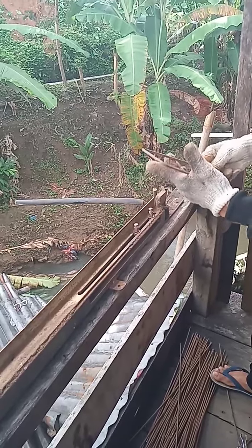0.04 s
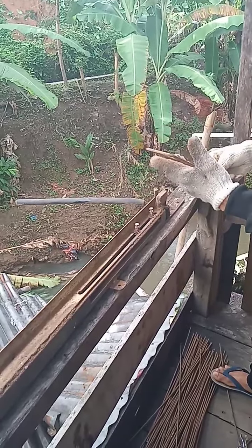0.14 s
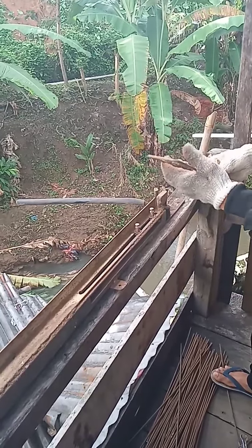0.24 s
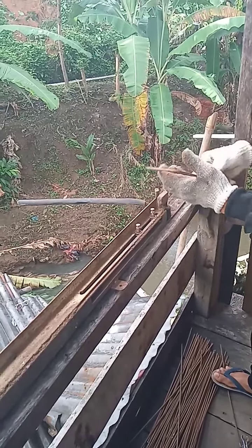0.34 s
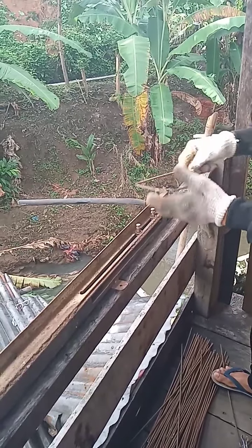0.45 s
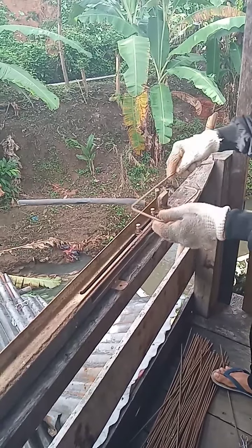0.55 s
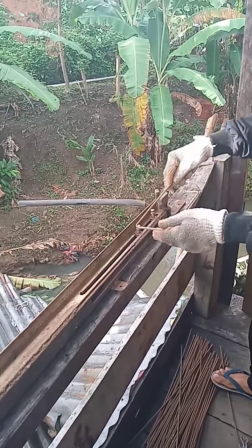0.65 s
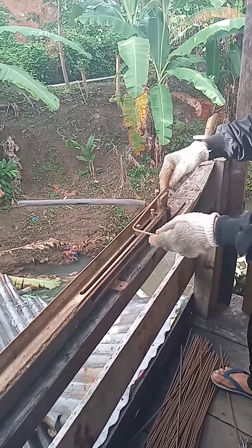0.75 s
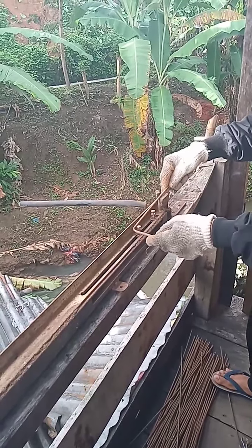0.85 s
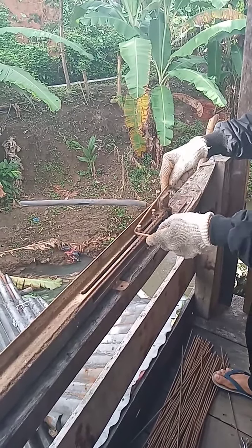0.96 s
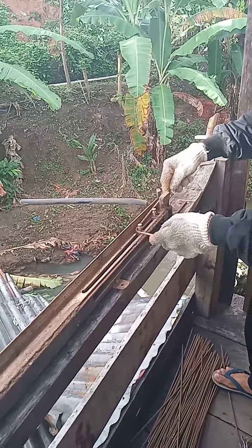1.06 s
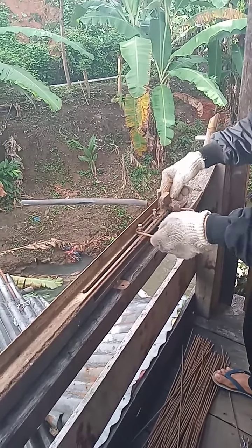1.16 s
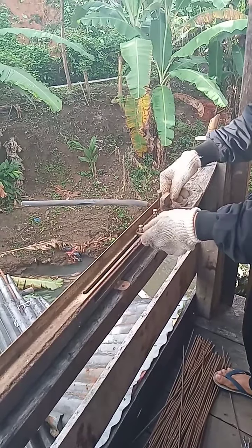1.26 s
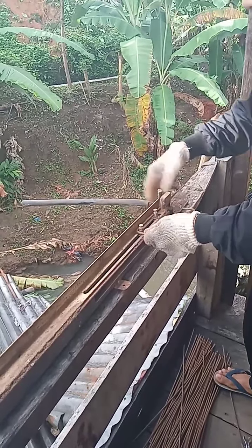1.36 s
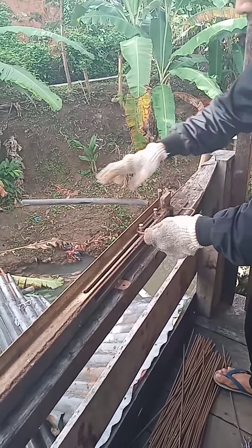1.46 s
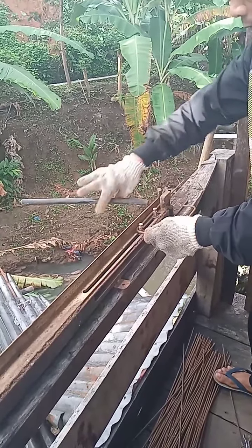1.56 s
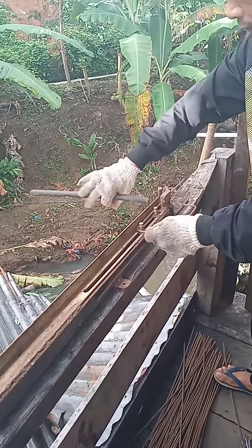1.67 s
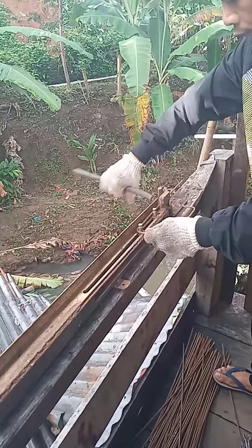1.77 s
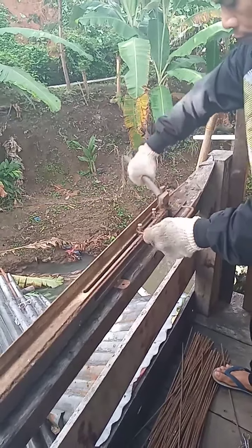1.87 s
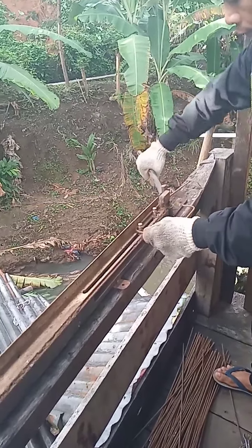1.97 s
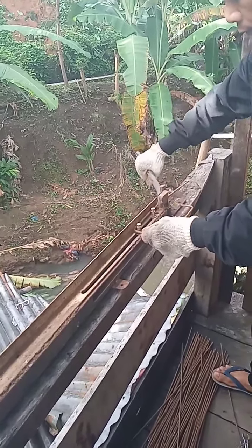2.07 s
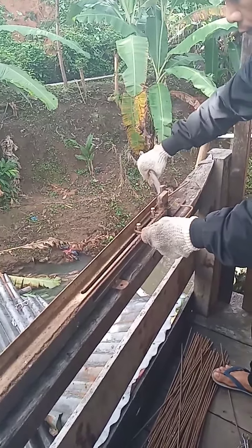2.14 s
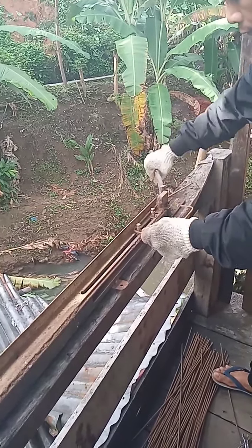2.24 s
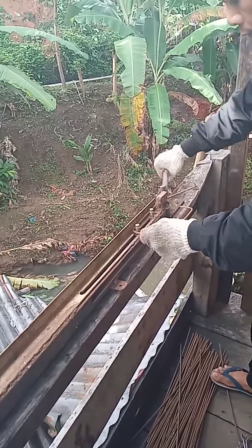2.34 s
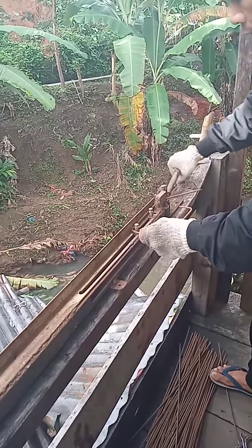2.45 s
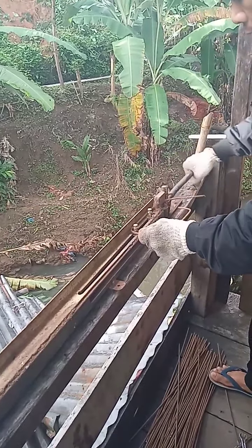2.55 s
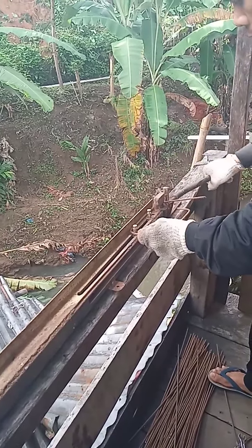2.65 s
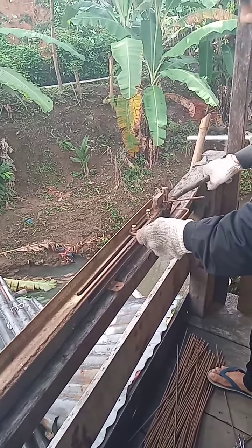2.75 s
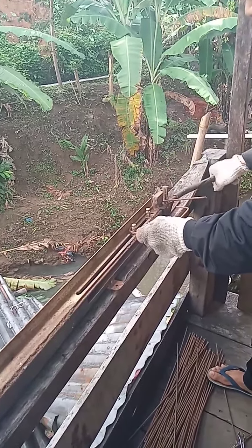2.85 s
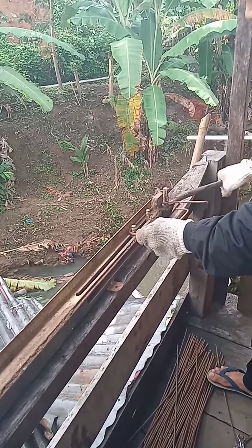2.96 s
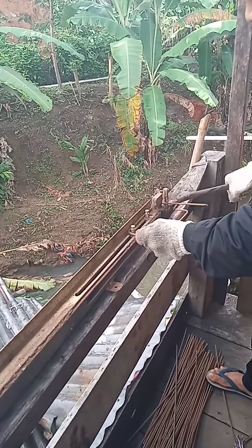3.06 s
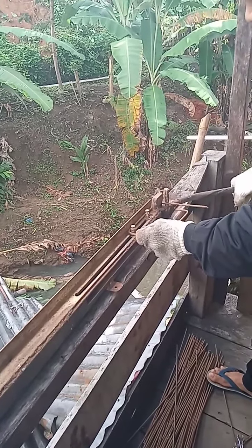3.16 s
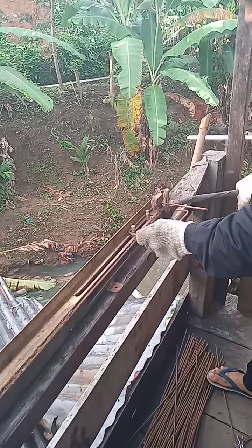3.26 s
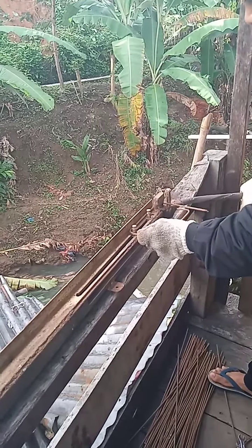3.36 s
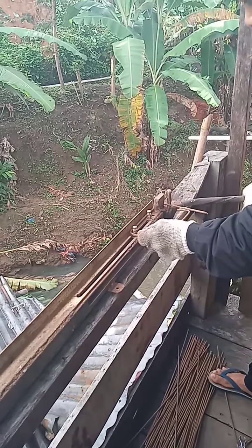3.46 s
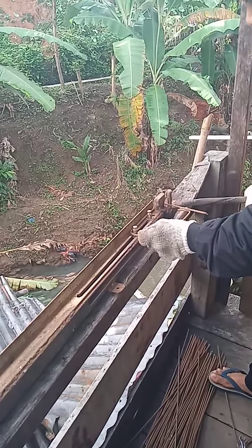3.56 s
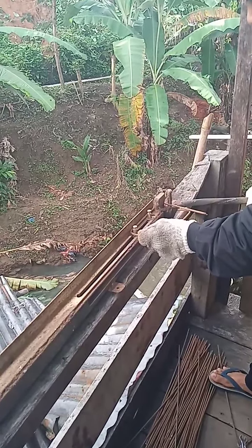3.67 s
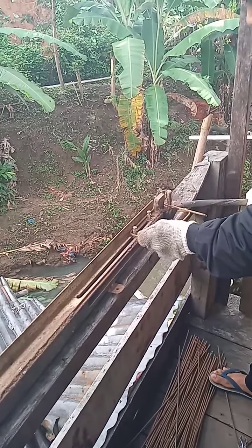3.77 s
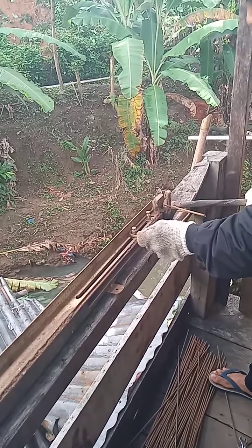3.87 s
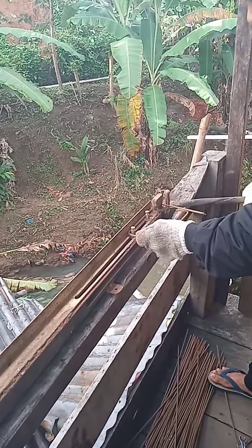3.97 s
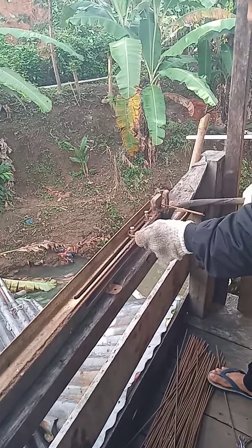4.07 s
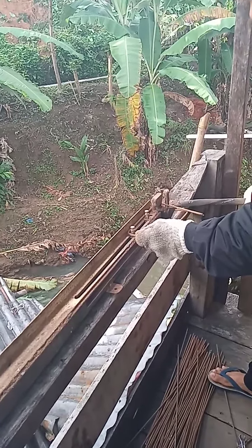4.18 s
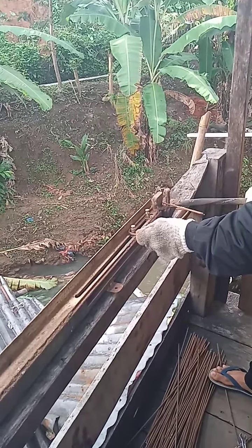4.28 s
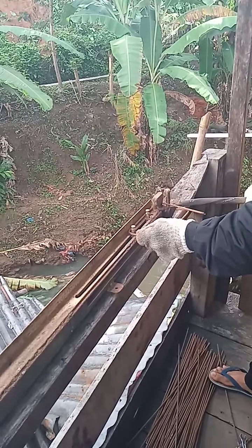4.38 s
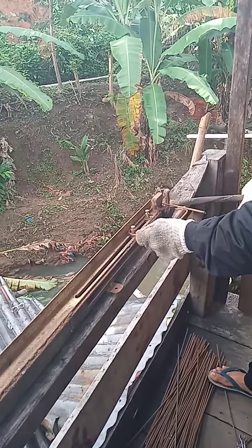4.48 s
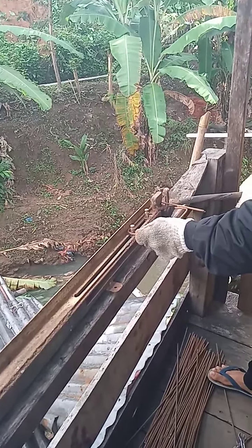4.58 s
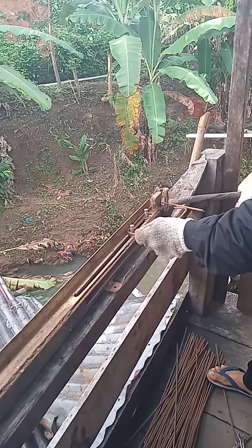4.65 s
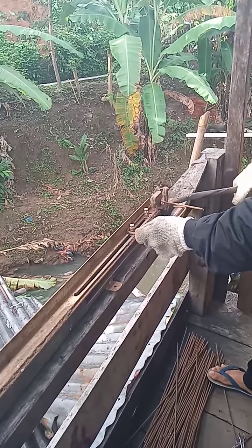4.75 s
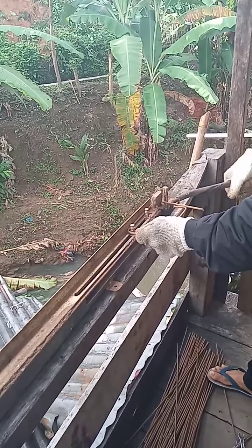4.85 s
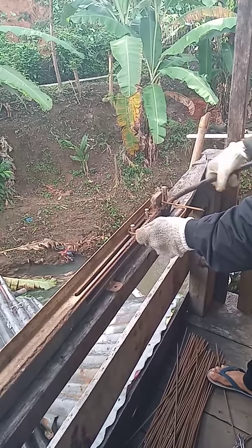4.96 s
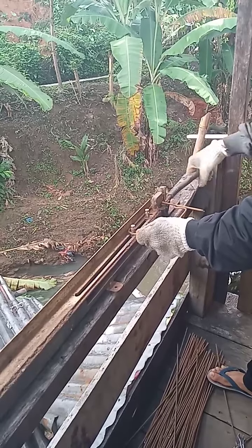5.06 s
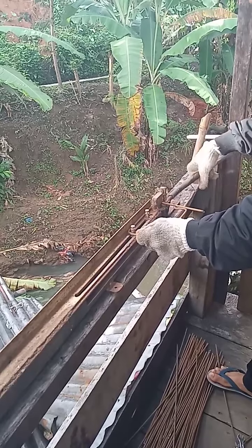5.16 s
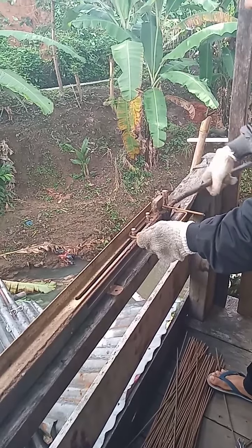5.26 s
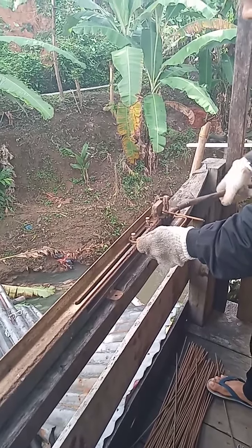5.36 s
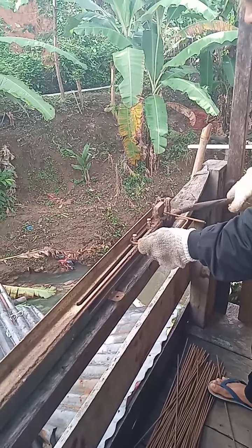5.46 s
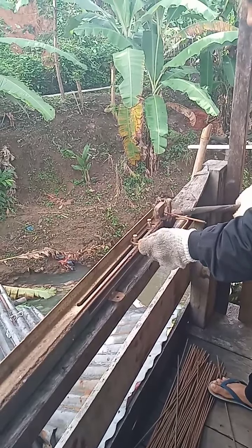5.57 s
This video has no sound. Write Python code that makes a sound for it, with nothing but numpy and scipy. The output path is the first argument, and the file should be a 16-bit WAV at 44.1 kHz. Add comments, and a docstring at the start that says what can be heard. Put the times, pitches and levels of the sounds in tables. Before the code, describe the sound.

Outdoors under an open roof, soft steady hiss and low rumble. A thin steel rod taps and rattles sharply between metal pins, pauses, then a few faint lever clinks lead to one loud, bright clank that shakes the wooden frame. Afterwards it is mostly quiet, with small squeaks of rubbing steel and dull knocks. Close microphone, both channels alike.

```python
"""A soft outdoor hiss and a low floor boom come first, under an open roof.
Then a thin steel rod clinks between the pins of a bending jig: ringing modes over a clash of noise.
The hand lever clinks too and bangs home once; the timber frame knocks and carries each blow on as noise.
The rod squeaks as it is pulled round: unsteady two-mode tones, roughened by scraping."""
import sys
import numpy as np
from scipy import signal
from scipy.io import wavfile

SR = 44100
rng = np.random.default_rng(int(sys.argv[2]) if len(sys.argv) > 2 else 0)


def persist_wave(psi):
    """Save psi, clipped to +-1, as 16-bit WAV."""
    counts = np.round(np.clip(psi, -1, 1) * 32767).astype(np.int16)
    wavfile.write(sys.argv[1], SR, np.atleast_2d(counts).T)


N = 247842
TIME = np.arange(N) / SR
EDGES = 28 * 2 ** (np.arange(56) / 6)   # sixth-octave band edges, Hz
CENTRES = np.sqrt(EDGES[1:] * EDGES[:-1])

# the hand lever meets the jig: start_s, level_db, body_db, treble_db, crack_db, ring_t60_s,
# favoured_low_mode_hz, favoured_high_mode_hz (levels in relative dB)
LEVER_BLOWS = [ (1.549, -37, 2.5, 4, -16, 0.13, 608, 2640), (1.566, -44, 9.5, 2, -9, 0.095, 842, 3360),
               (1.8620, -39, -3, -3, -13, 0.28, 1165, 3330),
               (1.9017, -31.5, 4.5, -7, -8.5, 0.086, 495, 608),
               (1.9303, -33.5, 5, -2, -10, 0.088, 1585, 2820),
               (2.5840, -18.5, 0, -0.5, -2.5, 0.19, 2977, 3784),
               (2.5873, -12, -3, 1.5, 3, 0.078, 800, 3810), (4.5030, -37.5, 2, -3.5, -17, 0.11, 400, 3350)]


def from_db(db):
    """Decibels to gain."""
    return 10 ** (np.asarray(db) / 20)


def rms_one(x):
    """Scale to unit rms."""
    return x / np.sqrt(np.mean(x ** 2) + 1e-20)


def at_hz(points, hz):
    """Read a table on a log-frequency axis."""
    f, value = np.transpose(points)
    return np.interp(np.log(hz), np.log(f), value)


def decay(t, t60):
    """Fall by 60 dB in t60 seconds."""
    return np.exp(-np.log(1000) * t / max(t60, 1e-3))


def add(out, s, sound):
    """Mix a sound in at time s."""
    i = int(np.clip(round(s * SR), 0, N - 1))
    out[i:i + len(sound)] += sound[:N - i]


def drift(rate):
    """Random motion through `rate` normal draws a second, joined by straight lines."""
    return np.interp(TIME * rate, np.arange(4096), rng.standard_normal(4096))


def noise_bands(size, order=3):
    """Sixth-octave bands of noise; a band 1 kHz wide would have rms 1."""
    # two noises alternate, so that neighbouring bands are independent
    white = rng.standard_normal((2, size + SR // 4)) * np.sqrt(SR / 2000)
    bands = []
    for k in range(len(CENTRES)):
        sos = signal.butter(order, EDGES[k:k + 2], "band", fs=SR, output="sos")
        bands.append(signal.sosfilt(sos, white[k % 2]))
    return np.array(bands)[:, -size:]   # drop the filters' start-up


def outdoors(middle_patchy_db=6.0, hiss_patchy_db=2.0, patches_per_s=13,
             hiss_db=2.0, waver_db=0.4, wavers_per_s=6):
    """Nearly steady hiss over a slowly swelling rumble and middle, which are patchier than the hiss."""
    # spectrum of the outdoor noise: frequency_hz, density_db (relative, per Hz)
    air = [(30, -20), (64, -33), (100, -4), (190, -1), (350, -4), (720, -15.5), (1150, -11), (1500, -7),
           (3700, -11), (4600, -23.5), (5400, -34), (7800, -34), (10000, -50.5), (15500, -50)]
    # swell of its low and middle range: time_s, rumble_db, middle_db (relative)
    background = [(0, 3, 2), (.62, 0, 6.5), (1.05, -1, 1.5), (1.4, 6.5, -3), (2.05, 8.5, 11.5),
                  (2.5, 2, 4.5), (3.2, 1.5, -1.5), (3.9, 1, 6), (4.42, -1.5, 0.5), (4.65, -2, 6.5),
                  (5.3, 3, 0.5), (5.62, -6, 3)]
    level_db = -50.5   # rms of the whole
    s, *columns = np.transpose(background)
    rumble, middle = [np.interp(TIME, s, column) for column in columns]
    hiss = hiss_db + waver_db * drift(wavers_per_s)
    out = np.zeros(N)
    for hz, band in zip(CENTRES, noise_bands(N)):
        # crossfade the three ranges over frequency
        low = at_hz([(220, 1), (600, 0)], hz)
        high = at_hz([(900, 0), (1400, 1)], hz)
        swell_db = low * rumble + high * hiss + (1 - low - high) * middle
        patchy_db = at_hz([(1200, middle_patchy_db), (2200, hiss_patchy_db)], hz)
        out += band * from_db(at_hz(air, hz) + swell_db + patchy_db * drift(patches_per_s))
    return from_db(level_db) * rms_one(out)


def platform(hz=82, width=28):
    """The lowest resonance of the wooden floor, stirred by shifting weight and shaken by the heaviest blow."""
    # the worker shifts weight to place the rod, then to fetch the lever: start_s, length_s, level_db
    moves = [(0, 0.43, -60), (0.47, 0.11, -50.5), (1.27, 0.92, -54.5)]
    attack_s, move_t60_s = 0.033, 0.66
    rest_db, shaken_db, shaken_t60_s = -77, -38.5, 1.39
    bang_s = max(LEVER_BLOWS, key=lambda row: row[1])[0]
    stir = np.full(N, from_db(rest_db))
    add(stir, bang_s, from_db(shaken_db) * decay(TIME, shaken_t60_s))
    for s, length, db in moves:
        rise = np.minimum(TIME / attack_s, 1)
        fall = decay(np.maximum(TIME - length, 0), move_t60_s)
        add(stir, s, from_db(db) * rise * fall)
    band = signal.butter(2, [hz - width / 2, hz + width / 2], "band", fs=SR, output="sos")
    return stir * rms_one(signal.sosfilt(band, rng.standard_normal(N)))


def contacts():
    """Every contact as (start s, level dB, colour over Hz in dB, build-up s, ring t60 s, favoured modes Hz)."""
    # the rod drops between the pins and rattles: start_s, level_db, body_db, treble_db, crack_db,
    # ring_t60_s, favoured_low_mode_hz, favoured_high_mode_hz (levels in relative dB)
    rod_taps = [ (.7412, -25, -0.5, 11, 0.5, 0.084, 2845, 3810),
                (.7537, -27, -13, 1, -22, 0.11, 1735, 3715), (.7870, -27, 4.5, 2, -13.5, 0.072, 608, 3660),
                (.842, -39, -1.5, -1.5, -16, 0.1, 993, 2640), (1.002, -50, 17, 10.5, 5, 0.21, 1735, 3390),
                (1.0183, -31.5, 4.5, 5.5, 7, 0.086, 3390, 4440),
                (1.0322, -18.5, -8, -4.5, -15.5, 0.054, 1735, 3330),
                (1.0400, -21, -0.5, 1.5, -1, 0.076, 842, 1735),
                (1.0565, -30, 8, -4, -10, 0.092, 2640, 3520), (1.141, -37.5, 8, -3, -9, 0.22, 1585, 3580),
                (1.203, -41.5, 7, -2, -7, 0.13, 1735, 1954), (1.313, -43.5, 5, -7, -17, 0.45, 993, 1585),
                (1.3412, -26, 0.5, -4.5, -17, 0.12, 842, 2610)]
    # dull knocks as the timber frame takes the load: start_s, level_db (relative), pitch_hz, ring_t60_s
    knocks = [(1.641, -35, 151, 0.076), (1.709, -41.5, 660, .26), (4.094, -37.5, 423, 0.2),
              (4.55, -42.5, 624, 0.33), (5.098, -33.5, 505, 0.095), (5.393, -43.5, 289, 0.1),
              (5.604, -39.5, 616, 0.065)]
    rod_bass_db, lever_bass_db = -13, -2   # the light rod hardly moves the frame, the heavy lever does
    # a harder blow builds up faster; the lightest touches only graze
    shortest_build_s, longest_build_s = 0.0019, 0.009
    medium_db, extra_build_s, build_halves_db = -30, 0.00036, 3.5   # extra build-up at medium level
    knock_build_s, knock_fall_db_per_octave = 0.005, 5   # falls above the pitch, flat below it

    for rows, bass_db in ((rod_taps, rod_bass_db), (LEVER_BLOWS, lever_bass_db)):
        for s, db, body_db, treble_db, crack_db, t60, *favoured in rows:
            colour = [(180, bass_db), (650, body_db), (1500, 0.0064), (3600, treble_db), (6500, crack_db)]
            extra_s = extra_build_s * .5 ** ((db - medium_db) / build_halves_db)
            build = min(shortest_build_s + extra_s, longest_build_s)
            yield s, db, colour, build, t60, favoured
    for s, db, hz, t60 in knocks:
        octaves_above = np.maximum(np.log2(CENTRES / hz), 0)
        colour = np.column_stack([CENTRES, -knock_fall_db_per_octave * octaves_above])
        yield s, db, colour, knock_build_s, t60, [hz]


def blows(modes_db=0.0, favour_db=10.0, clash_db=-6.5, after_db=0.0, scatter_db=0.5,
          usual_t60=0.14, chatter_db=2.5, uneven_db=4.0):
    """Each blow rings the steel's modes over a chattering clash, then frame and roof carry it on."""
    # ringing of rod, pins and channel: frequency_hz, level_db (relative), t60_s (before the grip damps it)
    jig_modes = [(157.7, -14, 0.32), (409, -10.5, 0.11), (507, -14.5, 0.18), (608, -11, 0.18),
                 (672, -39.5, 0.33), (799, -11.5, 0.22), (835, -10, 0.14), (899, -15, 0.25),
                 (985, -8.5, 0.32), (1114, -23, 0.021), (1386, -16.5, 0.16), (1486, -12, 0.38),
                 (1587, -3.5, 0.13), (1710, -3.5, 0.098), (1944, -9, 0.21), (2222, -9.5, 0.22),
                 (2665, -8, 0.12), (2805, -6.5, 0.11), (2734, -21, 0.36), (2935, -18.5, 0.38),
                 (3134, -13.5, 0.4), (3410, -5.5, 0.12), (3416, -5, 0.14), (3492, -11.5, 0.26),
                 (3700, -7, 0.15), (3820, -13.5, 0.27), (4260, -8, 0.19), (4530, -20.5, 0.19),
                 (4790, -16.5, 0.22), (5910, -20.5, 0.077), (8430, -27, 0.18)]
    # crowd of close, quickly damped modes: frequency_hz, density_db (relative, per Hz)
    clash_spectrum = [(35, -26.5), (80, -12), (160, -1), (400, -2), (750, -3), (1200, -2), (1700, 1),
                      (2300, -3.5), (3000, 6), (3900, 2), (5300, -13.5), (8300, -20), (9400, -36),
                      (15000, -36)]
    # damping of the clash: frequency_hz, life (share of the blow's ring time)
    clash_life = [(500, 2.98), (3500, 0.62), (6000, 1.18), (12000, 0.3)]
    # after-sound of timber frame and roof: frequency_hz, density_db (relative, per Hz)
    after_spectrum = [(35, -44.5), (80, -15.5), (170, -7), (330, -11.5), (700, -16.5), (1500, -20),
                      (3700, -16.5), (5300, -40.5), (8000, -44), (10000, -63.5), (15000, -56.5)]
    # its dying away: frequency_hz, t60_s
    after_t60 = [(60, 1), (200, 0.95), (500, 0.63), (1500, 0.41), (4000, 0.42), (12000, 0.4)]
    span, brief = 4 * SR // 5, SR // 5   # lengths of ring and clash, samples
    after_swell_s = 0.019
    out, t, noise = np.zeros(N), TIME[:span], noise_bands(2 * SR)
    hz, mode_db, mode_t60 = np.transpose(jig_modes)
    modes = np.array([np.exp(2j * np.pi * f * t) * decay(t, t60) for f, t60 in zip(hz, mode_t60)])
    fades = np.array([decay(t, t60) for t60 in at_hz(after_t60, CENTRES)])
    fades *= 1 - np.exp(-t / after_swell_s)
    chatter = from_db(chatter_db * drift(500))
    for s, db, colour, build, t60, favoured in contacts():
        # where and how hard the steel lands colours the blow and picks the modes that stand out
        tint = at_hz(colour, CENTRES)
        ring_db = mode_db + modes_db + at_hz(colour, hz) + scatter_db * rng.standard_normal(len(hz))
        ring_db[[np.argmin(abs(hz - f)) for f in favoured]] += favour_db
        phases = np.exp(2j * np.pi * rng.random(len(hz)))
        sound = ((from_db(ring_db) * phases) @ modes).real
        sound *= decay(t, usual_t60) ** max(usual_t60 / t60 - 1, 0)   # a firm grip damps the rod

        # each blow takes its own stretches of the noise
        i, j = rng.integers(0, SR, 2)
        dying = np.array([decay(t[:brief], t60 * life) for life in at_hz(clash_life, CENTRES)])
        uneven = uneven_db * rng.standard_normal(len(tint))
        clash_gain = from_db(at_hz(clash_spectrum, CENTRES) + clash_db + tint + uneven)
        clash = clash_gain @ (noise[:, i:i + brief] * dying)
        sound[:brief] += clash * chatter[i:i + brief]   # the rod bounces on the pin

        after_gain = from_db(at_hz(after_spectrum, CENTRES) + after_db + tint)
        sound += np.einsum("b,bt,bt->t", after_gain, noise[:, j:j + span], fades)
        add(out, s, from_db(db) * np.minimum(t / max(build, 1e-4), 1) * sound)
    return out


def squeaks(waver=0.014, rough=0.67, scrape_db=-9.5, scrape_width_hz=650):
    """Stick and slip keeps the rod sounding in short, unsteady spells, with some scraping round it."""
    # rod rubbing on pin and lever: start_s, length_s, level_db (rms), pitch_hz, second_mode_db (re the first)
    rubs = [(1.749, 0.059, -53.5, 694, -25), (1.86, 0.037, -42.5, 1162, -26),
            (3.55, 0.13, -51.5, 1545, -23), (3.69, 0.068, -50.5, 1580, -19),
            (3.983, 0.073, -55, 1580, -5.5), (4.079, 0.087, -53, 1578, -26), (4.208, 0.1, -49.5, 1580, -16),
            (4.317, 0.12, -63.5, 1600, -8), (4.44, .13, -55, 1555, 0.5), (5.42, 0.061, -57.5, 1397, -11)]
    second_mode_ratio = 2.756   # the rod's next bending mode sounds along
    out, wobble = np.zeros(N), drift(330)
    scrape = np.interp(TIME * scrape_width_hz, np.arange(N), rng.standard_normal(N))
    grip = 1 + rough * drift(220) + from_db(scrape_db) * scrape
    for s, length, db, hz, second_db in rubs:
        span = slice(int(s * SR), int((s + length) * SR))
        phase = 2 * np.pi * np.cumsum(hz * (1 + waver * wobble[span])) / SR
        tone = np.sin(phase) + from_db(second_db) * np.sin(second_mode_ratio * phase)
        tone *= grip[span]
        add(out, s, from_db(db) * rms_one(tone * np.sqrt(np.hanning(len(tone)))))
    return out


def scene():
    """Everything reaches both channels alike."""
    return np.tile(outdoors() + platform() + blows() + squeaks(), (2, 1))


def record(dry, cutoff_hz=15700):
    """Peaks are clipped just under full scale, then the top is cut."""
    low_pass = signal.ellip(10, .1, 80, cutoff_hz, fs=SR, output="sos")
    return signal.sosfilt(low_pass, np.clip(dry, -.95, .95))


dry = scene()
out = record(dry)
persist_wave(out)
```